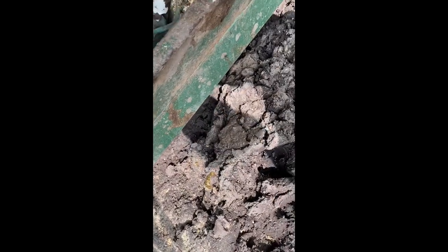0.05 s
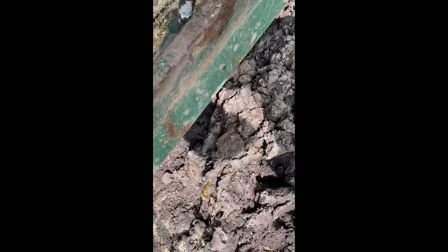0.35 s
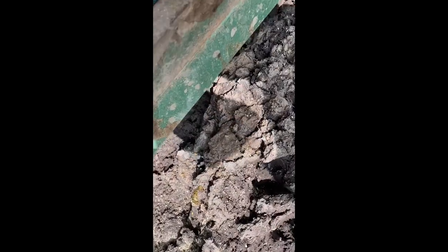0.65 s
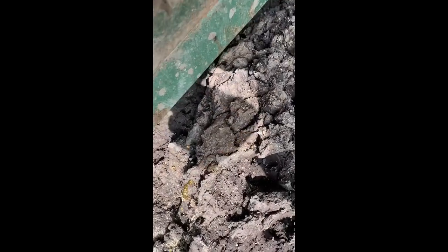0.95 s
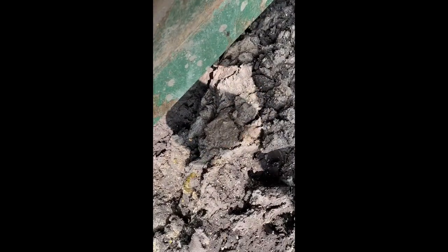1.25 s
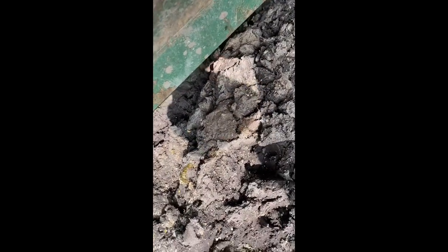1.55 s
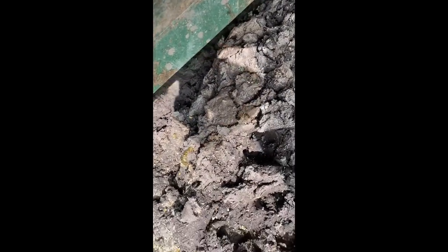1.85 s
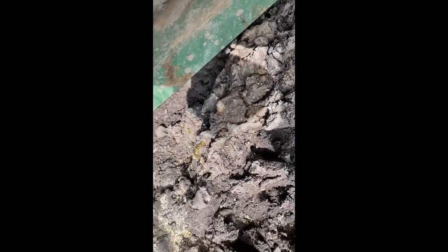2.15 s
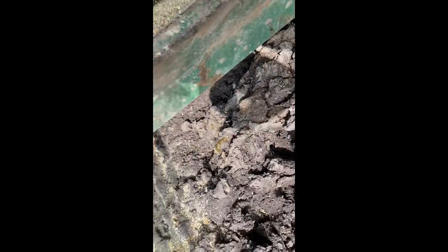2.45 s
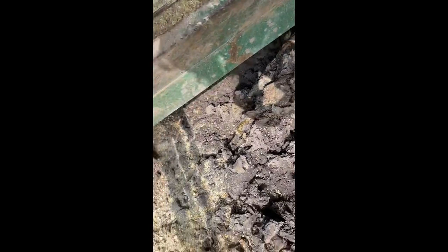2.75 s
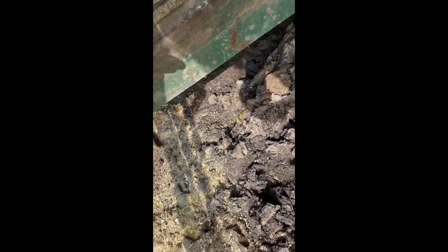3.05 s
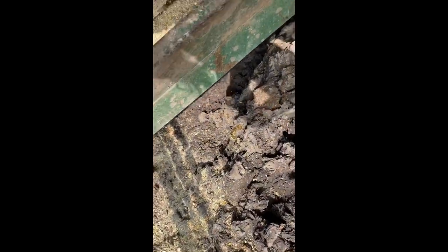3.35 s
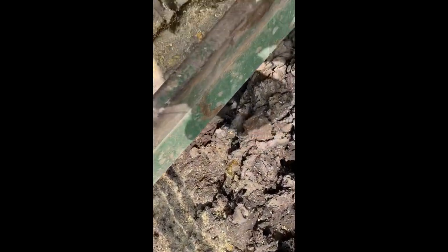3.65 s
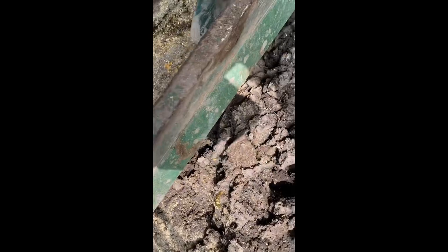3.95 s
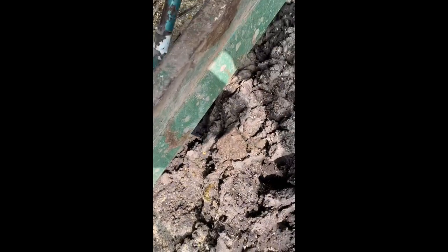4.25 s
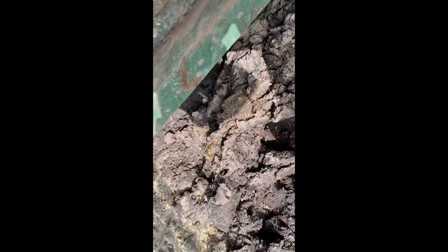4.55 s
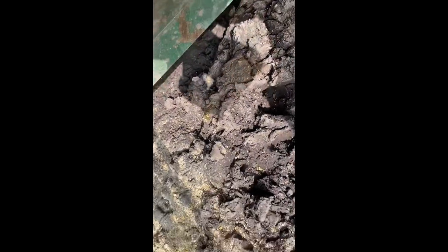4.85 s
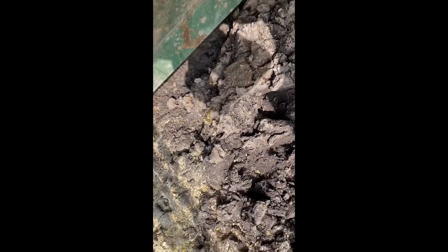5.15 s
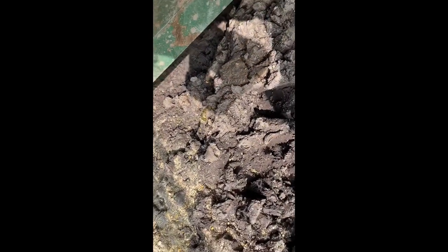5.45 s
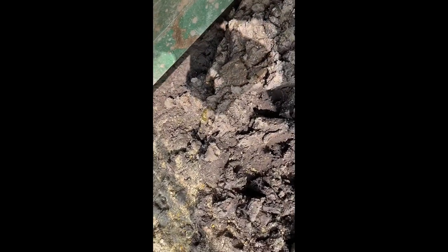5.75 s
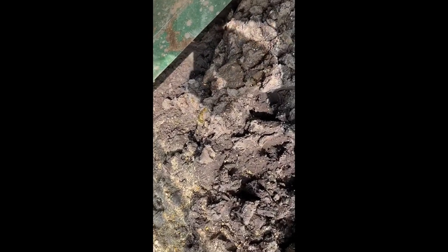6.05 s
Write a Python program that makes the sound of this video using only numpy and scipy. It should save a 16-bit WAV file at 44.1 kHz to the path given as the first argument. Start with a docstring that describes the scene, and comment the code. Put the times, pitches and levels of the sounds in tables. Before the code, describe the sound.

A blade scrapes caked wet feed from a steel cattle feeder, close by, over faint outdoor rumble and hiss. The first rough stroke comes at 0.3 seconds, crunching and grinding, with ringing steel, brief squeaks and clods thudding on sheet metal. A cow hums faintly from 0.5 to 1 second. A nearer cow hums low through her nose from 0.9 to 2.1 seconds, under a second stroke at 1.2. Light scratches, small cracks and sliding husks follow. At 3.2 seconds the near cow hums again, slowly rising. A heavy thud at 3.9 starts the longest, loudest scrape, full of cracking lumps, which ends around 4.6 with a hollow falling tone. Lighter touches lead to a fourth stroke at 5.4, with more cracks and thuds, just as the call opens into a full moo. Another cow hums softly around 6 seconds.

```python
"""A blade scrapes caked wet feed out of a steel cattle feeder, close by and outdoors, in four rough
strokes with lighter touches between. The crust tears in countless tiny breaks that make the trough
ring; lumps crack off and clods thud on the sheet metal. A nearby cow hums twice through her nose,
and the second call rises and opens into a moo. Other cows hum early on and at the end."""
import sys
import numpy as np
from scipy import signal
from scipy.fft import rfft, irfft, next_fast_len
from scipy.io import wavfile
from scipy.ndimage import uniform_filter1d

SR = 44100
rng = np.random.default_rng(int(sys.argv[2]) if len(sys.argv) > 2 else 0)


def generate_wav(signal):
    """Clip the signal to [-1, 1] and save it as 16-bit WAV at the path in sys.argv[1]."""
    frames = np.transpose(np.atleast_2d(signal))
    scaled = np.clip(frames, -1, 1) * 32767
    pcm = np.round(scaled).astype(np.int16)
    wavfile.write(sys.argv[1], SR, pcm)


N = 273155
T = np.arange(N) / SR
EARS = np.array([[1], [-1]])  # adds a "side" signal to the left ear and takes it from the right

# Table levels are relative. A t60 is the time to fade by 60 dB; a spread is half a swell's length.
# blade strokes: start/s, rise/s, hold/s, t60/s, grind/dB, rasp/dB, rumble/dB, rumble's low edge/Hz
STROKES = [ (0.0, 0.0018, 0.025, 0.13, -38, -42, -47, 100),
           (0.274, 0.098, 0.081, 0.34, -18.5, -21, -31.5, 144),
           (0.502, 0.02, 0.049, 0.59, -29.5, -34, -40.5, 101),
           (0.775, 0.13, 0.095, 0.53, -48.5, -47, -51.5, 95),
           (1.062, 0.022, 0.086, 0.24, -36, -45.5, -42, 122),
           (1.239, 0.048, 0.22, 0.34, -23.5, -29, -31.5, 138),
           (2.315, 0.057, 0.047, 0.16, -49, -54.5, -80, 100),
           (2.512, 0.012, 0.012, 0.41, -48.5, -47.5, -81, 100),
           (2.686, 0.11, 0.12, 0.48, -51, -54, -57, 99), (3.052, 0.09, 0.025, 0.13, -44, -49.5, -62, 124),
           (3.213, 0.054, .03, 0.2, -48, -79, -47.5, 125),
           (3.876, .21, 0.076, 0.87, -19.5, -21.5, -29.5, 84.5),
           (4.278, 0.029, 0.12, 0.43, -24, -25, -41.5, 97),
           (4.508, 0.035, 0.036, 0.07, -27, -40.5, -76, 92),
           (4.914, 0.047, 0.074, 0.44, -31, -42, -46, 159),
           (5.115, 0.077, 0.046, 1.04, -35, -41.5, -39, 193),
           (5.41, 0.085, 0.12, 0.52, -25.5, -37, -24.5, 174),
           (5.821, 0.025, 0.027, 0.099, -40, -42.5, -52, 166),
           (5.863, 0.028, .07, 16, -46.5, -53.5, -41, 146)]
# tone of the scraping noise shared by both ears, with a gap near 7 kHz: f/Hz, level/dB
SCRAPE_MID = [(21, -67), (35, 24.5), (103, 2), (222, -2.5), (279, -5), (602, -2), (720, -8), (930, -6),
              (1510, -12.5), (1720, -11.5), (2170, -15.5), (5320, -19), (7230, -41), (9830, -23),
              (16000, -37)]
# the part of the scraping noise that differs between the ears: f/Hz, level/dB
SCRAPE_SIDE = [(35, -57), (60, -34), (301, -10), (363, -2), (458, 5.5), (1340, 1), (1820, -9), (2580, -0.5),
               (5460, -5), (8120, -10.5), (10500, -20.5), (13600, -10), (16000, -17)]
# lumps cracking off: t/s, level/dB, rasp compared with grind/dB
CRACKS = [(0.26, -25, -6.5), (0.323, -31, -2), (0.467, -22, -8), (0.519, -25, 3.5), (0.56, -34, 3),
          (0.886, -38, 5), (1.008, -26, -19), (1.282, -22, 7.5), (1.784, -29, -2), (1.994, -39.5, 2.5),
          (2.025, -35, -8), (2.284, -29.5, -16), (2.521, -36.5, 0), (2.649, -32, -23), (2.806, -37.5, -13),
          (2.914, -39, -18), (3.655, -38, -20), (3.855, -14, -0.5), (3.9, -23.5, 0.5), (3.973, -23.5, 5.5),
          (4.085, -18.5, 7.5), (4.162, -20, 5), (4.211, -23, 4), (4.292, -16.5, 9), (4.357, -13.5, 5.5),
          (4.367, -18, 2.5), (4.924, -27, -9), (5.19, -35, 4), (5.427, -20, -7), (5.445, -20, -3),
          (5.498, -17, -30), (5.556, -14, -2), (5.595, -13.5, -5), (6.151, -35.5, 5)]
# pitches at which the trough rings (its modes): f/Hz, width/Hz, level/dB
TROUGH_MODES = [(106, 42, -2.5), (190.5, 10.6, -4), (279.4, 20.2, 2), (376.6, 16, -7.5), (722, 27.5, -1),
                (819, 28, -7), (1040, 21, -5.5), (1511, 20, -7), (1950, 32, -9.5), (2158, 54, -3),
                (2444, 34, -9.5), (2505, 18, -7), (2635, 15, 0), (2864, 60, -2.5), (3700, 81, -6),
                (4070, 24, -9), (4400, 130, -24), (5700, 970, -17)]
# weak bands between those modes: f/Hz, width/Hz, depth from 0 to 1
DEAD_BANDS = [(562, 240, 0.31), (937, 113, 0.4), (1276, 110, 0.4), (1710, 130, 0.28), (2236, 48, 0),
              (3310, 200, 0.26), (4950, 600, 0.41)]
# low outdoor rumble and thin hiss in both ears, with gaps near 7 and 13.6 kHz: f/Hz, level/dB
BACKGROUND_MID = [(15, -24), (25, 4), (97, 3.5), (659, -15), (2350, -22.5), (2990, -26), (4250, -19.5),
                  (5880, -26), (6560, -41), (7710, -47.5), (9320, -22.5), (11600, -19.5), (13600, -35),
                  (14800, -17.5), (16000, -98)]
# the part of that rumble and hiss that differs between the ears: f/Hz, level/dB
BACKGROUND_SIDE = [(15, -52), (25, 3), (92, 8), (840, 4), (1840, -6), (2280, -3), (4250, 2), (5280, -6),
                   (8590, -4.5), (10100, -9), (11300, -17), (13200, 8.5), (16000, -102)]
# clods landing on the sheet floor: t/s, level/dB, middle of the pitch drop/Hz, t60/s
THUDS = [(0.059, -24, 89, 0.22), (0.131, -27, 130, 0.2), (0.235, -21, 131, 0.2), (0.304, -10, 175, 0.092),
         (0.604, -15.5, 109.5, 0.14), (0.66, -23, 109, 0.24), (1.007, -17, 110.6, 0.23),
         (1.014, -27, 273, 0.2), (1.794, -22.5, 139, 0.074), (2.282, -33.5, 188, 0.062),
         (2.651, -27.5, 121, 0.12), (2.80, -35.5, 104, 0.17), (2.923, -34.5, 72.6, 0.26),
         (3.856, -4, 159, 0.076), (3.871, -3.5, 143, 0.064), (5.424, -22, 275, 0.23),
         (5.514, -25, 292, 0.079), (5.599, -18, 275, 0.12), (5.944, -22, 206, 0.16)]
# patches of steel ringing under the blade: t/s, spread/s, f/Hz, width/Hz, level/dB
STEEL_PATCHES = [(0.374, 0.044, 1510, 110, -30), (0.376, .04, 4070, 140, -27), (0.39, .06, 1047, 99, -32),
                 (0.396, .035, 4560, 130, -28), (0.409, .04, 402, 70, -33), (0.405, .055, 3710, 130, -29),
                 (0.423, .035, 5290, 240, -28.5), (0.519, .015, 4660, 300, -33),
                 (0.538, .02, 753, 200, -34), (0.611, 0.032, 625, 510, -33), (1.018, .01, 1000, 130, -45),
                 (1.284, .025, 1990, 100, -38), (1.304, 0.038, 2880, 150, -33),
                 (1.319, 0.045, 3720, 180, -32), (1.423, 0.0246, 2010, 90, -38), (1.429, .06, 893, 90, -34),
                 (1.449, .07, 3250, 230, -34.5), (1.459, .06, 1165, 170, -32.5),
                 (1.503, 0.027, 301, 59.6, -27), (2.039, 0.016, 560, 120, -46.5),
                 (2.663, 0.0077, 1250, 280, -43), (2.912, .01, 980, 280, -50.5),
                 (2.967, 0.0096, 1070, 300, -54), (3.863, .008, 4300, 200, -32), (3.9, .05, 2893, 90, -39),
                 (4.098, .04, 2610, 120, -26.5), (4.101, 0.077, 2190, 120, -40),
                 (4.134, .09, 5250, 280, -34.5), (4.138, .08, 742, 110, -29), (4.138, .06, 1490, 130, -37),
                 (4.222, .14, 286, 48.7, -29), (4.33, .05, 2187, 90, -29), (4.33, .05, 1500, 200, -32.5),
                 (4.327, .04, 455, 69.9, -31.5), (4.37, 0.052, 2486, 80.5, -28.5),
                 (5.484, 0.061, 1910, 140, -41), (5.521, .08, 235, 44.4, -24),
                 (5.564, 0.014, 2400, 259, -29)]
# the blade chattering and pinging on bare steel: t/s, spread/s, f/Hz, level/dB
SQUEALS = [(0.39, 0.024, 820, -20.5), (0.398, 0.057, 284.8, -20), (0.423, 0.021, 727, -20.5),
           (0.436, 0.015, 2480, -21), (1.027, 0.025, 1516, -43), (1.306, 0.04, 737, -24.5),
           (4.118, 0.013, 2653, -18), (4.363, 0.0047, 1223, -15.5), (4.363, 0.0094, 2405, -13),
           (5.61, 0.066, 366, -21.5)]
# the course of each cow call: t/s, pitch/Hz, level/dB
EARLY_HUM = [(0.45, 102, -58), (0.6, 100, -41), (0.88, 97, -41), (1.02, 94, -54)]
NEAR_HUM = [(0.88, 76, -54), (0.97, 79, -40), (1.15, 84, -40), (1.4, 93, -38.5), (1.65, 92, -39.5),
            (1.85, 89, -41.5), (2.04, 83, -46.5), (2.14, 79, -60)]
NEAR_MOO = [(3.23, 73, -57), (3.29, 72, -43), (3.42, 80, -37), (3.6, 88, -35), (3.78, 99, -37),
            (4.15, 104, -36.5), (4.45, 98, -39), (4.6, 97, -43), (4.8, 112, -40), (4.98, 123, -35.5),
            (5.14, 135, -32), (5.35, 137.5, -25.5), (5.57, 137.5, -25), (5.8, 122, -40), (6.19, 129, -48)]
LATE_HUM = [(5.92, 81, -49), (6.03, 82.5, -40.5), (6.19, 88.3, -44)]
# tone of a cow's voice through the nose and through the open mouth: f/Hz, level/dB
NOSE = [(70, -5), (105, -5), (150, -19), (185, -18), (240, -20.5), (315, -18), (380, -29), (600, -44),
        (1500, -76), (4000, -50)]
MOUTH = [(70, -64), (137, -24), (200, -33), (235, -8.5), (280, 4.5), (325, 0), (400, -23.5), (600, -18),
         (1000, -53), (2500, -42), (4000, -52)]
# loose chaff sliding: t/s, spread/s, level/dB
CHAFF_SLIDES = [(2.392, 0.08, -55.5), (2.592, 0.02, -46.5), (2.88, 0.073, -55), (2.893, 0.33, -59.5),
                (3.155, 0.056, -44), (4.244, 0.0043, -22), (5.201, 0.029, -41)]
# tone of the hiss of dry husks: f/Hz, level/dB
HUSKS = [(880, -25), (1500, -12.5), (5940, 3), (7760, -35), (8000, -20), (8570, 0), (12100, 0.5),
         (13700, -11), (14300, 0), (16000, -7.5)]


def undb(db):
    """Turn decibels into a number to multiply by."""
    return np.exp(np.log(10) / 20 * np.asarray(db))


def unit(x):
    """Scale x to an average strength (rms) of 1."""
    return x / np.sqrt(np.mean(x ** 2))


def band(x, lo_hz, hi_hz, order=2):
    """Keep the part of x between two frequencies."""
    return signal.sosfilt(signal.butter(order, [lo_hz, hi_hz], "band", fs=SR, output="sos"), x)


def band_rms(x, lo_hz, hi_hz):
    """Strength of x between two frequencies."""
    return np.std(band(x, lo_hz, hi_hz, order=4))


def shape(x, gain_at):
    """Turn each frequency of x up or down by gain_at(hz)."""
    size = next_fast_len(N + SR // 10)
    hz = np.arange(size // 2 + 1) * SR / size
    return irfft(rfft(x, size) * gain_at(hz), size)[..., :N]


def below(x, edge_hz):
    """Keep the part of x below a frequency."""
    return shape(x, lambda hz: 1 / (1 + (hz / edge_hz) ** 6))


def read_db(tone, hz):
    """Look up the level at any frequency in a tone table."""
    table_hz, db = np.transpose(tone)
    return np.interp(np.log(hz + 1e-9), np.log(table_hz), db)


def colour(x, tone):
    """Filter x by a tone table."""
    return shape(x, lambda hz: undb(read_db(tone, hz)))


def ring(x, hz, width):
    """One resonance: it lets through only the sound near one pitch."""
    return signal.lfilter(*signal.iirpeak(hz, hz / width, fs=SR), x)


def wander(rate):
    """A random curve, about 1 in size, that takes a new turn `rate` times a second."""
    points = rng.standard_normal(4096)
    return 1.25 * np.interp(T * rate, np.arange(len(points)), points)


def fade(start, t60):
    """Start suddenly, then die away."""
    out, heard = np.zeros(N), slice(int(start * SR), int((start + 2 * t60) * SR))
    out[heard] = np.exp(-np.log(1000) * (T[heard] - start) / t60)
    return out


def swell(centre, spread):
    """A smooth, bell-shaped rise and fall."""
    out, near = np.zeros(N), np.abs(T - centre) < 4 * spread
    out[near] = np.exp(-((T[near] - centre) / spread) ** 2)
    return out


def pressure(start, rise, hold, t60):
    """One stroke: the blade leans in, holds and lets go."""
    out, on = np.zeros(N), (T > start) & (T < start + rise + hold + 2 * t60)
    age = T[on] - start
    lean_in = np.minimum(age / rise, 1) ** 1.06
    let_go = np.exp(-np.log(1000) * np.maximum(age - rise - hold, 0) / t60)
    out[on] = lean_in * let_go
    return out


def settling(patchy_db):
    """Strength of loose crumbs shifting in fits and starts, with one short lull."""
    return undb(-63 + patchy_db * wander(25)) * (1 - swell(centre=3.4, spread=0.28))


def fractures(rate, spread_db):
    """Tiny breaks click at random moments, about `rate` a second, some larger than others."""
    clicks = (rng.random(N) < rate / SR) * rng.choice([-1, 1], N)
    return unit(clicks * undb(spread_db * np.minimum(rng.standard_normal(N), 2.5)))


def slips(count=4500, t60=0.06, lo_hz=1200, hi_hz=11000):
    """Each slip of the blade plucks the steel at a new spot, which rings briefly at its own pitch."""
    age = np.arange(int(0.75 * t60 * SR)) / SR
    out, decay = np.zeros(N + len(age)), np.exp(-np.log(1000) * age / t60)
    spots = rng.random((count, 2))
    sizes = undb(2.5 * np.minimum(rng.standard_normal(count), 1.5))
    for (when, pitch), size in zip(spots, sizes):
        start, hz = int(when * N), lo_hz + (hi_hz - lo_hz) * pitch
        out[start:start + len(age)] += size * decay * np.sin(2 * np.pi * hz * age)
    return unit(out[:N])


def crust(push, bite_db=-36):
    """Breaks bunch up as the blade sticks and slips; a hard push bites through to pluck the steel."""
    bite = np.minimum(push / undb(bite_db), 1)
    layers = []
    for tone in (SCRAPE_MID, SCRAPE_SIDE):
        breaks = colour(fractures(rate=4500, spread_db=4) + 0.53 * bite * slips(), tone)
        layers.append(breaks / band_rms(breaks, 2000, 6000))
    mid, side = layers
    return (mid + EARS * undb(-1) * side) * undb(1.23 * wander(220))


def reflections(x, count=3, share=0.14, drift_s=0.00012):
    """Sound bounces between blade and trough; as the blade moves, the hollow tone wanders."""
    out = x.copy()
    for ear in range(2):
        for delay_s in rng.uniform(0.0005, 0.005, count):
            bounced = np.interp(T - delay_s - drift_s * wander(7), T, x[ear])
            out[ear] += share * rng.choice([-1, 1]) * bounced
    return out / np.sqrt(1 + count * share ** 2)


def load_rumble(bass, pushes):
    """The load on the trough floor rumbles; it comes before the tearing and outlasts it."""
    out = np.zeros((2, N))
    for push, (*_, db, lowest_hz) in zip(pushes, STROKES):
        on = push > 1e-4
        load = push[on] ** 0.54 * undb(db - 1)
        out[:, on] += band(bass[:, on], lowest_hz, 1540, order=3) * load
    return out


def cracks(rise_s=0.0023, t60=0.089):
    """Each lump that breaks off adds a burst of power to the grind and to the rasp."""
    grind_power, rasp_power = np.zeros(N), np.zeros(N)
    for start, db, bright_db in CRACKS:
        burst = undb(db - 7) * fade(start, t60) * np.minimum((T - start) / rise_s, 1)
        grind_power += burst ** 2
        rasp_power += (burst * undb(bright_db)) ** 2
    return grind_power, rasp_power


def scraping(dulling_db_per_s=22, hard_db=-33):
    """With each stroke the load rumbles (bass), wet feed grinds (middle) and dry grit rasps (treble)."""
    pushes = [pressure(*stroke[:4]) for stroke in STROKES]
    wet_power, dry_power = settling(patchy_db=7) ** 2, settling(patchy_db=4) ** 2
    for push, (start, _, hold, _, wet_db, dry_db, _, _) in zip(pushes, STROKES):
        dulling_db = dulling_db_per_s * np.clip(T - start, 0, hold)  # the dry top crust goes first
        wet_power += (push * undb(wet_db)) ** 2
        dry_power += (push * undb(dry_db - dulling_db)) ** 2
    judder = undb(0.6 * wander(30))
    wet_push, dry_push = np.sqrt(wet_power) * judder, np.sqrt(dry_power) * judder
    wet_bursts, dry_bursts = cracks()
    grind_level = np.sqrt((wet_push * undb(-5.5)) ** 2 + wet_bursts)
    rasp_level = np.sqrt((dry_push * undb(-0.5)) ** 2 + dry_bursts)

    tear = crust(dry_push)
    bass, treble = below(tear, 400), tear - below(tear, 1800)
    middle = (tear - bass - treble) * undb(EARS * 1.5)  # a little to the left
    hardness = np.minimum(rasp_level / undb(hard_db), 1)
    soft = below(treble, 9500)
    treble = soft + hardness * (treble - soft)  # only a hard break makes the highest treble

    mono = tear.mean(axis=0)
    rumble = load_rumble(bass, pushes) / band_rms(mono, 130, 235)
    grind = grind_level * middle / band_rms(mono, 500, 1500)
    rasp = rasp_level * reflections(treble) / band_rms(mono, 2000, 6000)
    return rumble + grind + rasp


def trough(force, cushion_db=-36, shift_db=4):
    """The steel rings; which modes ring most keeps changing as the blade travels over it."""
    strength = uniform_filter1d(np.abs(force).mean(axis=0), size=900)
    felt = force * np.minimum(strength / undb(cushion_db), 1)  # caked feed cushions light touches
    modes = sum(ring(felt * undb(db + shift_db * np.minimum(wander(18), 1)), hz, width)
                for hz, width, db in TROUGH_MODES)
    out = 0.64 * force + undb(1.5) * modes
    for hz, width, depth in DEAD_BANDS:
        out = out - depth * ring(out, hz, width)
    return out


def echoes(x, echo_db=-20):
    """Sound scatters faintly off the feeder's walls and the pen."""
    tail = band(rng.standard_normal((2, SR // 2)), 390, 4300) * fade(0.001365, t60=0.19)[:SR // 2]
    tail /= np.sqrt(np.sum(tail ** 2) / 2)
    return x + undb(echo_db) * signal.fftconvolve(x, tail, axes=1)[:, :N]


def background(mid_db=-52, side_db=-59):
    """A low outdoor rumble and a thin hiss, drifting slightly in level."""
    mid = unit(colour(rng.standard_normal(N), BACKGROUND_MID))
    side = unit(colour(rng.standard_normal(N), BACKGROUND_SIDE))
    return (undb(mid_db) * mid + EARS * undb(side_db) * side) * undb(wander(5.62))


def thuds(drop=0.41, drop_s=0.0194, attack_s=0.0036):
    """Clods send bending waves through the metal; higher ones arrive first, so each thud drops in pitch."""
    out, crumbs = np.zeros(N), unit(band(rng.standard_normal(N), 55, 174))
    for start, db, middle_hz, t60 in THUDS:
        blow = fade(start, t60)
        heard = blow > 0
        age = np.arange(heard.sum()) / SR
        hz = middle_hz * (1 - drop + 2 * drop * np.exp(-age / drop_s))
        level = undb(db - 2) * blow[heard] * (1 - np.exp(-age / attack_s))
        out[heard] += level * (np.sin(2 * np.pi * np.cumsum(hz) / SR) + 0.49 * crumbs[heard])
    return out


def steel_patches():
    """Grit makes one patch of steel after another ring roughly, each at its own pitch."""
    out = np.zeros((2, N))
    for centre, spread, hz, width, db in STEEL_PATCHES:
        near = np.abs(T - centre) < 3 * spread
        push = swell(centre, spread)[near]
        grit = band(rng.standard_normal((2, SR)), hz - width / 2, hz + width / 2)[:, -len(push):]
        mid, side = (unit(x * push) * np.sqrt(np.mean(push ** 2)) for x in grit)
        apart = 0.58 * min(hz / 3500, 1)  # higher pitches differ more between the ears
        out[:, near] += undb(db) * (mid + EARS * side * apart)
    return out


def squeals(waver=0.009, rough_db=3):
    """Brief rough tones sound where the blade's slipping locks to one pitch."""
    out = np.zeros((2, N))
    slip_time = np.cumsum(1 + waver * wander(300)) / SR
    roughness = undb(-2 + rough_db * wander(200))
    for centre, spread, hz, db in SQUEALS:
        near = np.abs(T - centre) < 3 * spread
        ear_phase = EARS * 0.1 * hz / 2000
        tone = np.sin(2 * np.pi * hz * slip_time[near] + ear_phase)
        out[:, near] += tone * undb(db) * (swell(centre, spread) * roughness)[near]
    return out


def cow_voice(call, mouth=0, boost_db=0, jitter=0.0035, shimmer_db=2.5, count=31):
    """Vocal folds buzz with many harmonics; opening the mouth (0 to 1) favours the throat's resonances."""
    times, pitches, levels = np.transpose(call)
    sounding = (T >= times[0]) & (T <= times[-1])
    hz, db = np.interp(T, times, pitches), np.interp(T, times, levels)
    mouth = mouth * sounding
    phase = 2 * np.pi * np.cumsum((hz * (1 + jitter * wander(70)))[sounding]) / SR
    moments = np.flatnonzero(sounding)[::100]  # the tone changes slowly, so every 100th sample will do
    harmonics = np.arange(1, count + 1)[:, None]
    harmonic_hz, opening = harmonics * hz[moments], mouth[moments]
    weights = undb((1.5 - opening) * read_db(NOSE, harmonic_hz) + opening * read_db(MOUTH, harmonic_hz))
    weights /= np.sqrt((weights ** 2).sum(axis=0) / 2)
    # upper throat resonances only come out through an open mouth: f/Hz, width/Hz, level/dB
    for centre, width, peak_db in [(795, 120, -11), (1500, 80, -25.5), (2310, 100, -22),
                                   (2610, 70, -27), (4120, 90, -31)]:
        weights += opening ** 2 * undb(peak_db) / (1 + (2 * (harmonic_hz - centre) / width) ** 2)
    lags = 2 * np.pi * rng.random(count)  # the way across the pen smears each pulse
    voice = np.zeros(N)
    for n, weight, lag in zip(harmonics, weights, lags):
        voice[sounding] += np.interp(T[sounding], T[moments], weight) * np.sin(n * phase + lag)
    # as the cow pushes harder, strong and weak pulses alternate and the voice roughens
    voice[sounding] *= 1 + 0.2 * mouth[sounding] ** 6 * np.sin(phase / 2)
    return voice * undb(db + boost_db + shimmer_db * wander(22) + mouth * wander(110))


def cattle():
    """The near cow barely opens her mouth in her first call and fully in her second; the others hum."""
    barely_open, wide_open = 0.17 * swell(centre=2.1, spread=0.59), swell(centre=5.35, spread=0.6)
    hum = cow_voice(NEAR_HUM, mouth=barely_open, boost_db=2, jitter=0.013, shimmer_db=1.5)
    moo = cow_voice(NEAR_MOO, mouth=wide_open, jitter=0.005, shimmer_db=1)
    return hum + moo + cow_voice(EARLY_HUM, jitter=0.012) + cow_voice(LATE_HUM)


def chaff():
    """Dry husks slide with a fine, bright hiss."""
    husks = np.array([unit(colour(fractures(rate=3500, spread_db=5.5), HUSKS)) for _ in range(2)])
    return husks * sum(undb(db) * swell(centre, spread) for centre, spread, db in CHAFF_SLIDES)


def feeder_shake(level_db=-37):
    """The long stroke is heavy enough to shake the whole feeder."""
    shudder = unit(band(fractures(rate=670, spread_db=-3), 33, 66))
    return shudder * undb(level_db) * pressure(start=3.98, rise=0.12, hold=0.24, t60=0.2)


def hollow_slide(start=4.35, glide_s=0.24, from_hz=1000, to_hz=530, level_db=-38):
    """As the blade slides out of the long stroke, a hollow resonance falls in pitch."""
    hz = from_hz * (to_hz / from_hz) ** np.clip((T - start) / glide_s, 0, 1)
    tone = np.sin(2 * np.pi * np.cumsum(hz) / SR)
    grit = unit(band(fractures(rate=2400, spread_db=3.5), 12, 110))
    return grit * tone * undb(level_db) * pressure(start, rise=0.0065, hold=0.22, t60=0.14)


def scene():
    """Work at the feeder in front, the cattle close by, a faint rumble and hiss behind."""
    feeder = trough(scraping()) + steel_patches() + feeder_shake() + hollow_slide() + squeals()
    loose_feed = thuds() + chaff()
    return echoes(feeder + loose_feed + cattle()) + background()


def record(dry, low_hz=42, top_hz=15900, ceiling=0.8):
    """The microphone loses the deepest bass; the hardest peaks are softly rounded, and the recorder cuts the
    top."""
    thin = signal.sosfilt(signal.butter(2, low_hz, "high", fs=SR, output="sos"), dry)
    rounded = ceiling * np.tanh(thin / ceiling)
    return signal.sosfilt(signal.ellip(10, 0.2, 80, top_hz, fs=SR, output="sos"), rounded)


dry = scene()
out = record(dry)
generate_wav(out)
```